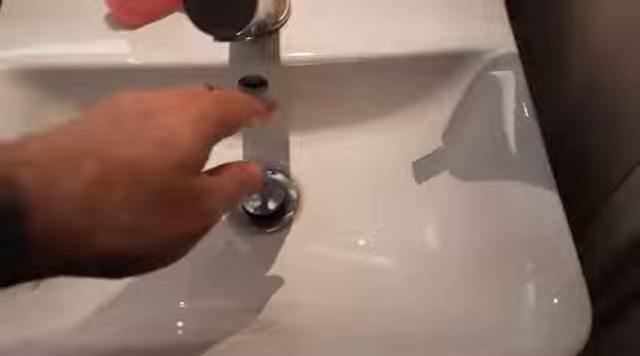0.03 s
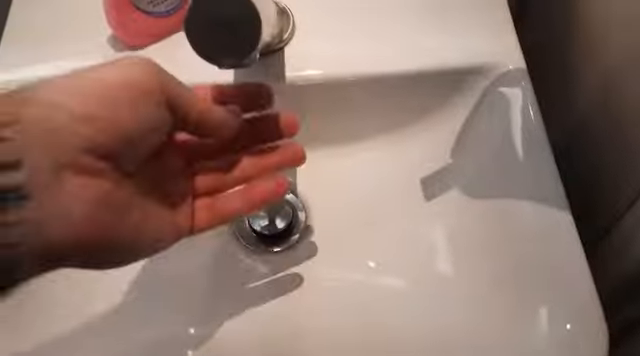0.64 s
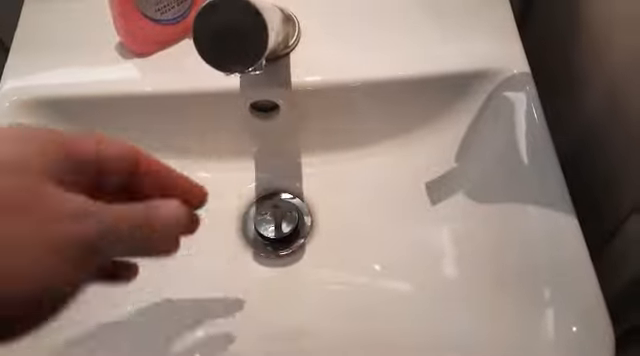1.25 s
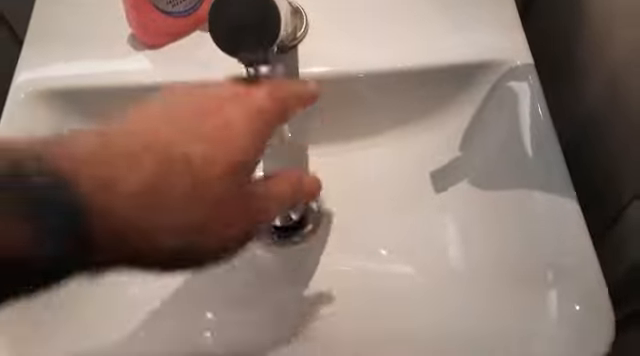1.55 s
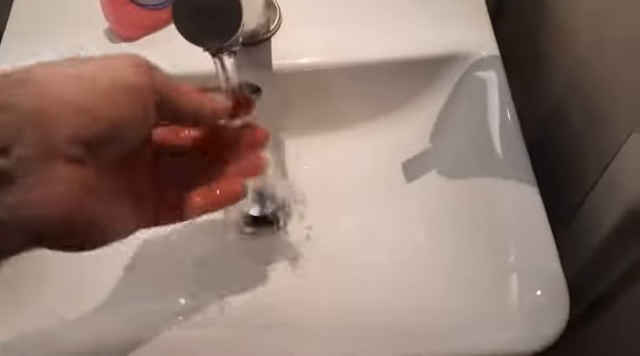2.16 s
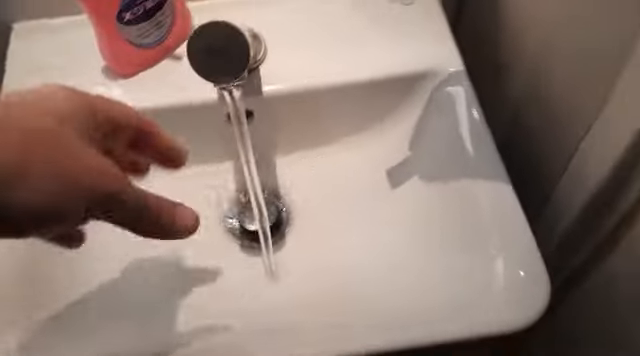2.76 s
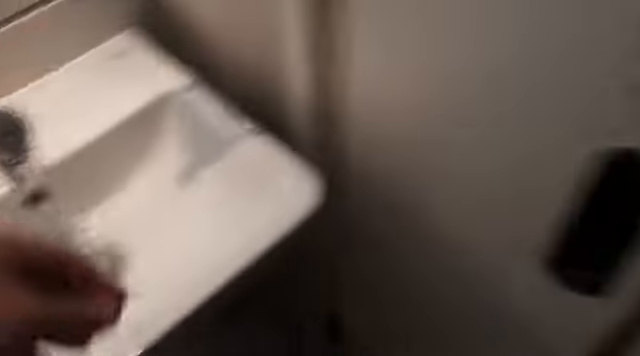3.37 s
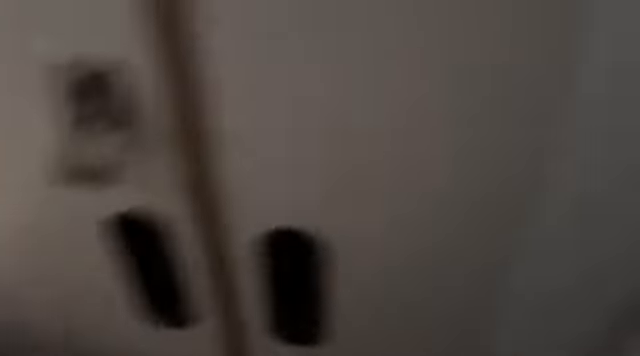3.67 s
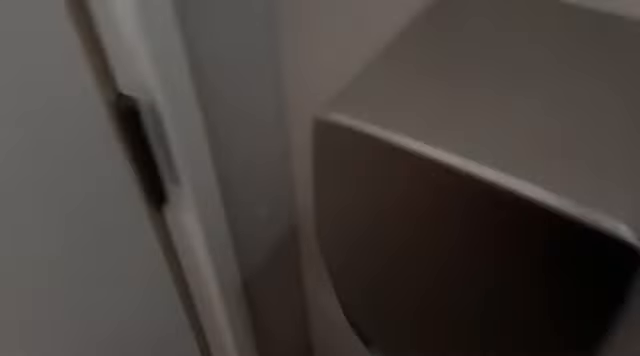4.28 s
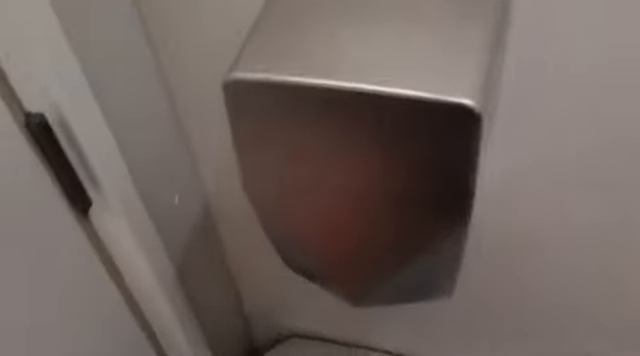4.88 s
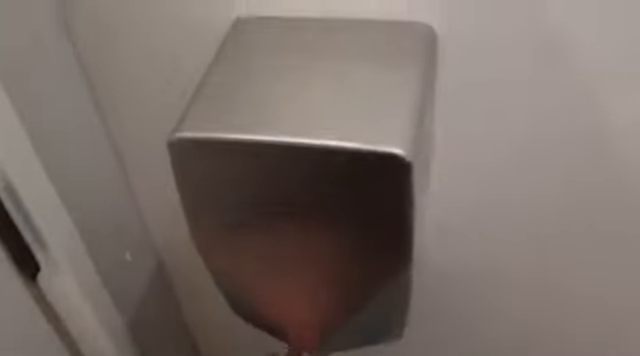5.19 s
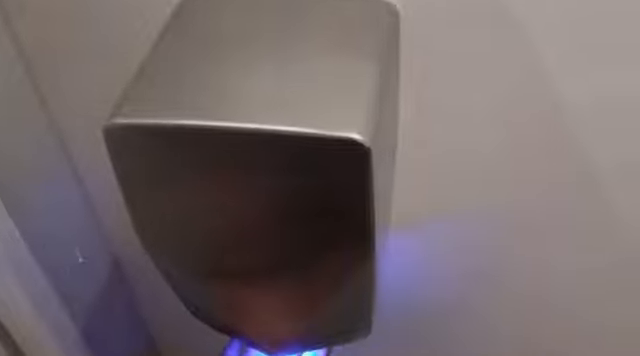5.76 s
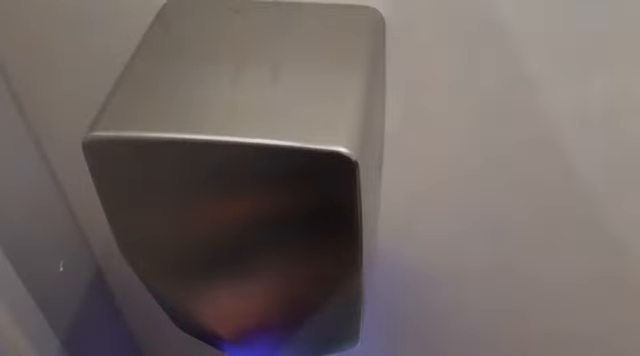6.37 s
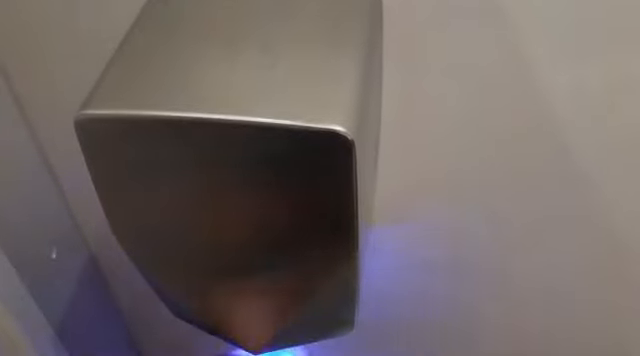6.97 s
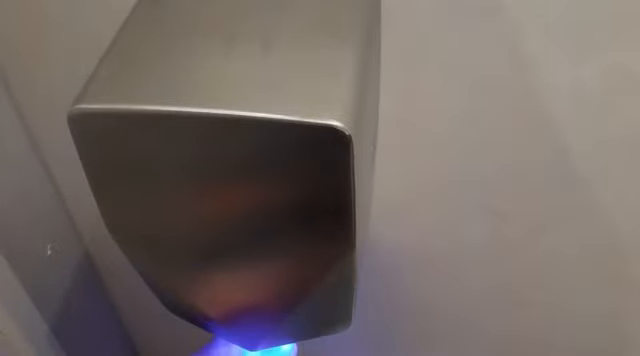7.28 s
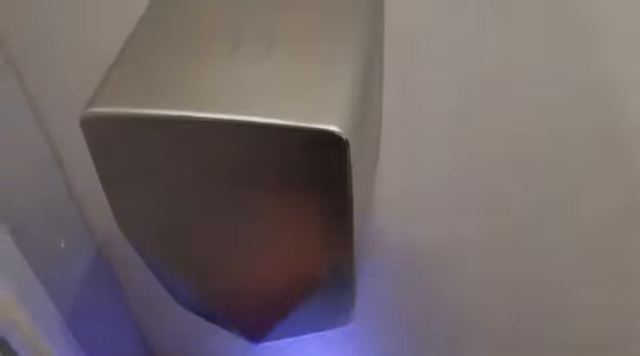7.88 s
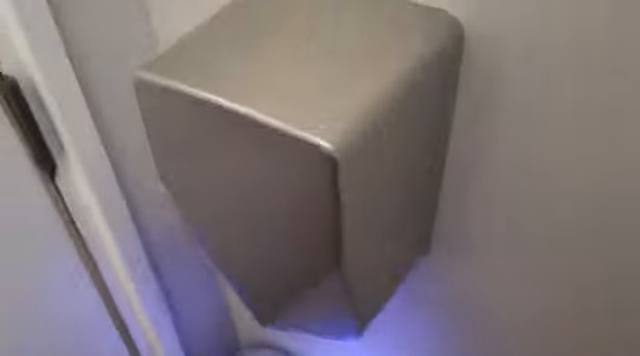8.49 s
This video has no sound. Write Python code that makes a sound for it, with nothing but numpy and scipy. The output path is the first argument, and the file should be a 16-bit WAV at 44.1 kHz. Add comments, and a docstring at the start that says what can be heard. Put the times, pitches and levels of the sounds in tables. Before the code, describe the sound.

Heard from close up, a tap opens with a knock and water spatters off a hand into a sink, slightly to the left. The drain gulps, something thuds, a sleeve rustles and the water stops. Then a hand dryer clicks and winds up into a loud, humming rush of air, strongest while it strikes the hands and quieter once they leave. The small tiled washroom adds a short echo.

```python
"""A hand dryer roars in a small tiled washroom: its turbulent jet grows as the motor spins up, and is much
louder while it strikes the hands. Before that, a push tap is knocked on. Water splashes over a hand,
runs into the basin and gurgles in the drain, where pockets of air resonate. The listener turns away,
something thuds, a sleeve swishes and the tap shuts off with a soft hiss; then the dryer clicks on.
The tiles reverberate, and a faint far fan excites the room's standing waves."""
import sys
import numpy as np
from scipy import signal
from scipy.fft import rfft, irfft, next_fast_len
from scipy.io import wavfile

SR = 44100
rng = np.random.default_rng(int(sys.argv[2]) if len(sys.argv) > 2 else 0)


def persist_wave(psi):
    """Save psi, clipped to +-1, as 16-bit WAV."""
    counts = np.round(np.clip(psi, -1, 1) * 32767).astype(np.int16)
    wavfile.write(sys.argv[1], SR, np.atleast_2d(counts).T)


N = 381024
T = np.arange(N) / SR

# jet striking the turning hands: time_s, rush_db, hiss_re_rush_db
JET_ON_HANDS = [(5.82, -17.3, -10), (5.95, -18, -7), (6.095, -21, -6.5), (6.14, -15, -10.5),
                (6.22, -18.3, -5.5), (6.36, -17.3, -2.5), (6.57, -16.5, -3), (6.66, -22.5, -6.5),
                (6.86, -21, 1), (6.99, -21, -2), (7.06, -15.3, -5), (7.22, -16.7, -2), (7.43, -16.4, -3),
                (7.48, -20.5, -5), (7.66, -21, -2), (7.81, -21, -3), (7.87, -18, -2)]
# spectra of the jet, blowing freely and striking the hands: frequency_hz, density_db
FREE_JET_SPECTRUM = [(140, -7), (230, -6.5), (350, 0.5), (520, -2), (800, -8.5), (2200, -11), (5000, -15),
                     (16000, -13.5)]
RUSH_SPECTRUM = [(500, -7), (1050, -8), (1500, 0.5), (2400, 0.5), (3400, -8.5), (6000, -7.5), (16000, -11)]
# steady ringing peaks in the dryer's rush: frequency_hz, boost_db
JET_PEAKS = [(472, 5.5), (803, 7), (945, 7), (1134, 8), (1306, 4), (1752, 4.5), (1953, 3.5), (2384, 4)]
# casing resonances that the rotor's hum sweeps through: frequency_hz, width_hz, hum_db
CASING_MODES = [(228, 50, -20.5), (374, 44, -20), (414, 8, -24), (427.5, 3.2, -17.5), (447, 4, -29)]
# glide of the motor's squeal: time_s, pitch_hz
SQUEAL_GLIDE = [(5.682, 1780), (5.726, 1880)]
# spray off the hand while it is in the stream: time_s, level_db
HAND_SPRAY = [(1.80, -50), (1.85, -38), (2.045, -32), (2.115, -48), (2.205, -32.5), (2.285, -47.5),
              (2.346, -44), (2.354, -28), (2.56, -37), (2.66, -64)]
# spectrum of the spray: frequency_hz, density_db
SPRAY_SPECTRUM = [(1800, -22.5), (3000, -7), (6000, -0.5), (10000, -1), (16000, 6.5)]
# water slopping into the basin: start_s, spray_db, bubbling_db
SLOSHES = [(1.985, -43, -47.5), (2.469, -40, -50), (2.694, -45.5, -49), (2.979, -45.5, -49),
           (3.118, -42.5, -48.5), (3.47, -45.5, -49)]
# cavity resonances of basin and waste pipe: frequency_hz, width_hz, gain_db
BASIN_MODES = [(205, 130, 1), (477, 127, 8), (1430, 240, 2.5), (2000, 500, -12)]
# single drops slapping down: start_s, level_db, pitch_hz
DROP_IMPACTS = [(1.834, -29, 5500), (1.9423, -15.5, 5230), (1.952, -23.5, 5300), (1.982, -18, 6660),
                (2.0167, -21, 2780), (2.128, -25, 7600), (2.1492, -20, 6650), (2.1984, -15.5, 5250),
                (2.239, -19.5, 11100), (2.3068, -21, 7300), (2.3511, -9, 12000), (2.367, -10, 7750),
                (2.4304, -5, 6600), (2.5106, -24, 1960), (2.5646, -14.5, 6800), (2.702, -28, 1650)]
# gulps of air in the drain: start_s, pitch_hz, level_db
DRAIN_GULPS = [(1.975, 477, -35.5), (2.697, 553, -42), (3.168, 480, -40), (3.394, 470, -28.5),
               (3.398, 1110, -44), (3.497, 444, -27), (3.545, 440, -30.5), (3.63, 445, -37.5),
               (3.737, 385, -34), (3.833, 365, -37.5), (3.882, 2040, -46.5)]
# spectra of the tap's push, the thud, the dryer's switch and the bumps: frequency_hz, density_db
TAP_PUSH_SPECTRUM = [(60, 6), (200, 6), (350, -3.5), (1500, -9), (3200, -24), (6500, -22), (10000, -4.5),
                     (16000, -23)]
THUD_SPECTRUM = [(70, -6), (190, 1.5), (400, -15), (680, -6), (1000, -23), (1450, -16.5), (3000, -27),
                 (7000, -38)]
SWITCH_SPECTRUM = [(140, -12), (240, -3), (380, 6.5), (600, -9), (2200, -21), (3800, -22), (16000, -11)]
BUMP_SPECTRUM = [(45, -7.5), (130, -6), (260, -10.5), (700, -25)]
# soft bumps of handling: centre_s, level_db
HANDLING_BUMPS = [(2.46, -48.5), (2.81, -54), (3.54, -44.5), (4.06, -42.5)]
# soft swishes, a sleeve rustling and then the tap's valve hissing shut: centre_s, level_db, half_width_s
SOFT_SWISHES = [(4.425, -40.5, .1), (4.955, -52, .06)]
# spectrum of the swishes: frequency_hz, density_db
SWISH_SPECTRUM = [(300, 0.5), (16000, -4)]
# spectrum of the far fan: frequency_hz, density_db
VENT_SPECTRUM = [(45, -1.5), (90, -6.5), (300, -13), (520, -28), (2000, -36.5), (4500, -41.5),
                 (16000, -33.5)]
# standing waves of the room: frequency_hz, boost_db
ROOM_MODES = [(145, 13.5), (210, 16)]
# stereo width of the diffuse field: frequency_hz, side_re_mid_db
STEREO_WIDTH = [(50, -9.5), (150, -15.5), (470, -0.5), (1900, -3.5), (5000, 0)]
# responses of the two microphones: frequency_hz, gain_db
LEFT_RESPONSE = [(10, 0.5), (6000, -0.06), (7650, 4.5), (8200, 0.5), (9800, -16), (13000, -6.5),
                 (16000, -10.5)]
RIGHT_RESPONSE = [(10, -1), (4500, -0.2), (6900, -2), (8200, -7.5), (9400, -7), (12800, -3), (16000, -9)]

DRYER_ON_S, FULL_SPEED_HZ, SPIN_UP_S, CREEP_S, CREEP_SHARE = 5.655, 489.4, .14, 0.99, .152
HANDS_IN_S, HANDS_OUT_S, ENTER_DB_PER_S, LEAVE_DB_PER_S = 5.81, 7.89, 199, 197
HUM_DB = -46.5  # away from the casing's resonances
TAP_OPEN_S, TAP_SHUT_S, FLOW_RISE_S, FLOW_FALL_DB_PER_S = 1.65, 4.93, 0.24, 66
STREAM_DB, BUBBLING_DB, VALVE_HISS_DB = -55.5, -59, -56
VALVE_GROWTH_DB_PER_S = 8.5  # the valve hisses more as it narrows
ROOM_T60_S, CUTOFF_HZ = 0.34, 16000


def air_jet():
    """Turbulence radiates broadband noise, rising with motor speed; hands in the jet add much more."""
    speed = motor_speed()
    free = rms_one(colour(washroom(diffuse(), wet_db=-5.0), FREE_JET_SPECTRUM))
    free *= from_db(-28.5) * speed ** 1.3
    # low eddies stir the room's standing waves, more so once the jet blows freely
    eddies = rms_one(boost(resonate(diffuse(), 178, 120), ROOM_MODES, width_hz=8.9))
    eddies *= from_db(np.interp(T, [7.4, 8.1], [-40.5, -33]))
    return (pan(free + hands_in_jet(speed), left_db=2.0) + pan(eddies, left_db=-0.8)) * dryer_on()


def hands_in_jet(speed):
    """Obstacles in a flow shed eddies: broad ones rush off the palms, fine ones hiss off the fingers."""
    rush_db, hiss_db = in_time(JET_ON_HANDS)
    stream = boost(colour(washroom(diffuse(), wet_db=-3), RUSH_SPECTRUM), JET_PEAKS, width_hz=19)
    rush = rms_one(signal.sosfilt(butterworth(4, 3400, "low"), stream))
    hiss = rms_one(high_pass(stream, hz=3400)) * from_db(hiss_db + 1.5)
    # the less the jet hisses on the fingers, the more it roars in the palms
    roar = colour(rush, [(520, 0), (1000, 0)]) * (from_db(-.8 * (hiss_db + 3.8)) - 1)
    # the rush brightens as the motor gains speed
    edge = signal.sosfiltfilt(butterworth(2, 2450, "high"), rush) * ((speed / .93) ** 2 - 1)
    away_db = ENTER_DB_PER_S * np.maximum(HANDS_IN_S - T, 0)
    away_db += LEAVE_DB_PER_S * np.maximum(T - HANDS_OUT_S, 0)
    flutter_db = 0.83 * drift(rate_hz=14.0)
    return from_db(rush_db - 0.69 - away_db + flutter_db) * (rush + roar + edge + hiss)


def motor():
    """Forced vibration: the rotor hums at its rotation rate, louder as it crosses casing resonances."""
    speed = motor_speed()
    rotor_hz = FULL_SPEED_HZ * speed
    phase = 2 * np.pi * np.cumsum(rotor_hz * (1 + 0.00194 * drift(rate_hz=22.7))) / SR
    resonant_gain = sum(from_db(db) * np.exp(-np.minimum(((rotor_hz - hz) / width_hz) ** 2, 20))
                        for hz, width_hz, db in CASING_MODES)
    hum_gain = (from_db(HUM_DB) * speed + resonant_gain) * from_db(2.0 * drift(rate_hz=56))
    labouring = (1 - speed) * np.sin(2 * phase) / 2  # an octave above, while the rotor is still slow
    hum = hum_gain * (np.sin(phase + 0.36 * drift(rate_hz=77)) + labouring)
    whine = from_db(-44) * swell(8.32, half_width_s=0.11) * np.sin(9 * phase)  # nine blades, briefly
    casing_ring = rms_one(resonate(rng.standard_normal(N), 1650, 70))
    casing_ring *= from_db(-34) * swell(5.76, half_width_s=0.025)  # as the motor takes hold
    # the starting current buzzes at twice the mains frequency
    inrush = from_db(-37) * swell(5.77, half_width_s=0.11) * np.sin(2 * np.pi * 100 * T)
    running = np.sqrt(2) * dryer_on() * (hum + whine + casing_ring + inrush)
    return washroom(pan(running, left_db=1.5), wet_db=-10)


def motor_speed():
    """The share of full speed approaches 1 exponentially: a quick run-up plus a slow creep."""
    age = np.maximum(T - DRYER_ON_S, 0)
    return 1 - (1 - CREEP_SHARE) * np.exp(-age / SPIN_UP_S) - CREEP_SHARE * np.exp(-age / CREEP_S)


def dryer_on():
    """A short ramp from 0 to 1 as the dryer is switched on."""
    return np.clip((T - DRYER_ON_S) / 0.016, 0, 1)


def squeal():
    """A chirp, a tone of rising frequency, sounds as the motor breaks loose."""
    tone = np.sin(2 * np.pi * np.cumsum(in_time(SQUEAL_GLIDE)[0]) / SR)
    return washroom(from_db(-38.5) * during(SQUEAL_GLIDE, fade_s=.008) * tone, wet_db=-10)


def running_water():
    """Impact and bubble resonance: spray crackles, small bubbles ping, larger ones ring the basin."""
    flow = np.clip((T - TAP_OPEN_S) / FLOW_RISE_S, 0, 1)
    flow *= from_db(-FLOW_FALL_DB_PER_S * np.maximum(T - TAP_SHUT_S, 0))
    unsteady_flow = flow * from_db(1.1 * drift(rate_hz=9))
    spray_gain, bubble_gain = from_db(STREAM_DB) * unsteady_flow, from_db(BUBBLING_DB) * unsteady_flow
    for start_s, spray_db, bubbling_db in SLOSHES:  # incoherent sources add in power
        slosh = burst(start_s, rise_s=0.0036, hold_s=0.029, t60_s=0.6)
        spray_gain = np.hypot(spray_gain, from_db(spray_db) * slosh)
        bubble_gain = np.hypot(bubble_gain, from_db(bubbling_db) * slosh)
    crackle = grains(per_s=1100, low_hz=2020, high_hz=15700, cycles=20, spread_db=4.0)
    pings = grains(per_s=1200, low_hz=2396, high_hz=11930, cycles=99, spread_db=4.0, pitches=32)
    hand_spray = rms_one(high_pass(colour(crackle + .5 * pings + diffuse() / 4, SPRAY_SPECTRUM), hz=1400))
    hand_spray *= from_db(in_time(HAND_SPRAY)[0] - 1.5) * during(HAND_SPRAY, fade_s=0.049)
    stream = spray_gain * rms_one(colour(pings + .8 * diffuse(), SPRAY_SPECTRUM))
    valve_gain = from_db(VALVE_HISS_DB + VALVE_GROWTH_DB_PER_S * (T - TAP_SHUT_S)) * flow
    valve = valve_gain * rms_one(resonate(diffuse(), 11500, 3000))
    bubbles = grains(per_s=700, low_hz=417.3, high_hz=3233, cycles=47, spread_db=3.0, pitches=32)
    bubbles += .5 * diffuse()
    basin = sum(from_db(db) * resonate(bubbles, hz, width_hz) for hz, width_hz, db in BASIN_MODES)
    basin = bubble_gain * rms_one(washroom(basin, wet_db=-2.5))  # deep in the bowl, so more reflected
    left_db = 4.1 * np.interp(T, [2.7, 4.2], [1, .4])  # the basin is on the left until the listener turns
    water = (hand_spray + stream + valve + basin) * from_db([left_db / 2, -left_db / 2])
    return washroom(water, wet_db=-1.0)


def drops():
    """Impact excites a damped ring: each large drop slaps, then its fragments patter on briefly."""
    impacts, age = np.zeros((2, N)), T[:SR // 20]
    for start_s, db, hz in DROP_IMPACTS:
        at = round(start_s * SR)
        slap = resonate(rng.standard_normal((2, len(age))) * np.exp(-age * hz / 5), hz, hz * 0.21)
        slap /= np.abs(slap.mean(axis=0)).max()
        fragments = resonate(rng.standard_normal((2, len(age))), hz, hz) * np.exp(-age / 0.024)
        impacts[:, at:at + len(age)] += from_db(db) * (slap + from_db(-13.5) * fragments)
    return washroom(pan(high_pass(impacts + 1e-18, hz=1476), left_db=2.5), wet_db=-3.0)


def gurgle():
    """Water spilling off the hand makes narrow-band noise whose centre frequency falls."""
    hz = np.interp(T, [2.39, 2.53], [3400, 1900])
    churn = (drift(rate_hz=150) + 1j * drift(rate_hz=140)) * np.exp(2j * np.pi * np.cumsum(hz) / SR)
    spill = from_db(-42.5) * swell(2.47, half_width_s=0.06) * churn.real
    return washroom(pan(spill, left_db=1.5), wet_db=-2)


def drain():
    """Trapped air resonates: each gulp rings a wobbling pocket and bursts small bubbles above it."""
    gulps, gulping = np.zeros(N), np.zeros(N)
    churn = rms_one(np.abs(1 + 0.32 * drift(rate_hz=56)))
    wobble_s = .00019 * drift(rate_hz=50)
    for start_s, hz, db in DRAIN_GULPS:
        envelope = from_db(db) * burst(start_s, rise_s=.02, hold_s=.028, t60_s=.24)
        gulps += np.sqrt(2) * envelope * churn * np.cos(2 * np.pi * hz * (T + wobble_s))
        gulping += envelope
    # the pipe washes hollowly, and once more as the flow ends
    washing = swell(3.7, half_width_s=0.25)
    wash = rms_one(resonate(resonate(diffuse(), 428, 180), 400, 300))
    wash *= from_db(-46) * washing + from_db(-54) * swell(4.82, half_width_s=.13)
    froth = grains(per_s=600, low_hz=720, high_hz=2150, cycles=60, spread_db=2.0)
    froth *= gulping * from_db(-23.5) + from_db(-52) * washing
    return pan(washroom(gulps + wash + froth, wet_db=-8), left_db=1.0)


def knock(start_s, spectrum, level_db, rise_s, hold_s, t60_s):
    """Structure-borne sound: a blow on a fitting booms through the wall and decays, the treble first."""
    boom = rms_one(colour(diffuse(), spectrum))
    treble = signal.sosfiltfilt(butterworth(2, 3000, "high"), boom)
    slow_decay = burst(start_s, rise_s, hold_s, t60_s)
    fast_decay = burst(start_s, rise_s, hold_s, 0.57 * t60_s)
    return from_db(level_db) * ((boom - treble) * slow_decay + treble * fast_decay)


def knocks():
    """Impact transients: the tap's push, a thud and the dryer's switch, with handling bumps between."""
    tap = knock(1.549, TAP_PUSH_SPECTRUM, level_db=-31.5, rise_s=0.0042, hold_s=0.03, t60_s=0.48)
    thud = knock(4.175, THUD_SPECTRUM, level_db=-27.0, rise_s=0.016, hold_s=0.026, t60_s=0.48)
    switch = knock(5.660, SWITCH_SPECTRUM, level_db=-31.5, rise_s=0.001, hold_s=0.029, t60_s=0.36)
    handling = sum(from_db(db) * swell(centre_s, half_width_s=0.077) for centre_s, db in HANDLING_BUMPS)
    return pan(tap + thud, left_db=3.0) + switch + handling * rms_one(colour(diffuse(), BUMP_SPECTRUM))


def swishes():
    """Swells of broadband noise: a sleeve rustles, then the tap's valve hisses shut."""
    envelope = sum(from_db(db) * swell(centre_s, half_s) for centre_s, db, half_s in SOFT_SWISHES)
    return envelope * rms_one(colour(diffuse(), SWISH_SPECTRUM))


def ventilation():
    """Noise from a faint far fan excites the room's standing waves."""
    hum = rms_one(boost(colour(diffuse(), VENT_SPECTRUM), ROOM_MODES, width_hz=7.6))
    return pan(from_db(-68) * hum, left_db=5.0)


def washroom(x, wet_db):
    """Reverberation: direct sound plus the tiles' dense, duller reflections, decaying exponentially."""
    tail = (diffuse() * from_db(-60 * T / ROOM_T60_S) * (T > .003))[:, :SR // 2]
    tail = signal.lfilter(*signal.butter(1, 7000, fs=SR), tail / np.sqrt(np.sum(tail ** 2) / 2))
    return x + from_db(wet_db) * signal.fftconvolve(np.atleast_2d(x), tail, axes=1)[:, :N]


def diffuse():
    """A diffuse field: broadband stereo noise, coherent in the bass and incoherent in the treble."""
    hz, db = np.transpose(STEREO_WIDTH)
    mid, side = rng.standard_normal((2, N))
    side = irfft(rfft(side) * from_db(np.interp(np.arange(N // 2 + 1) * SR / N, hz, db)), N)
    return np.array([mid + side, mid - side])


def grains(per_s, low_hz, high_hz, cycles, spread_db, pitches=20):
    """A Poisson stream of droplets or bubbles of uneven size, each a damped resonator; rms 1."""
    ringing = np.zeros((2, N))
    for hz in np.geomspace(low_hz, high_hz, pitches):
        wait, size, left, right = rng.random((4000, 4)).T
        at = np.cumsum(-np.log(1 - wait) * SR * pitches / per_s).astype(int)
        size_db = spread_db * np.minimum(-np.log(1 - size), 3)
        strength = from_db(size_db) * np.sin(2 * np.pi * np.array([left, right]))
        clicks = np.zeros((2, N))
        clicks[:, at[at < N]] = strength[:, at < N]
        ringing += resonate(clicks, hz, 2 * hz / cycles)
    return rms_one(ringing)


def resonate(x, hz, width_hz):
    """A damped resonator with unit gain at its peak."""
    radius = np.exp(-np.pi * width_hz / SR)
    feedback = [1, -2 * radius * np.cos(2 * np.pi * hz / SR), radius ** 2]
    return signal.lfilter(np.array([1, 0, -1]) * (1 - radius ** 2) / 2, feedback, x + 1e-18)


def boost(x, modes, width_hz):
    """Resonance lifts a sound at the frequency of each mode."""
    return x + sum((from_db(db) - 1) * resonate(x, hz, width_hz) for hz, db in modes)


def colour(x, spectrum):
    """Filter by a spectrum that falls 12 dB per octave beyond its ends."""
    hz, db = np.transpose(spectrum)
    size = next_fast_len(N + SR // 10, real=True)
    bin_hz = np.maximum(np.arange(size // 2 + 1) * SR / size, 1)
    skirts = np.minimum(1, np.minimum(bin_hz / hz[0], hz[-1] / bin_hz)) ** 2
    gain = skirts * from_db(np.interp(np.log(bin_hz), np.log(hz), db))
    return irfft(rfft(x, size) * gain, size)[..., :N]


def butterworth(order, hz, kind):
    """Sections of a filter with a maximally flat passband."""
    return signal.butter(order, hz, kind, fs=SR, output="sos")


def high_pass(x, hz):
    """Attenuate by 24 dB per octave below a corner frequency."""
    return signal.sosfilt(butterworth(4, hz, "high"), x)


def drift(rate_hz):
    """Random fluctuation: low-passed noise of rms 1."""
    hz = np.arange(N // 2 + 1) * SR / N
    return rms_one(irfft(rfft(rng.standard_normal(N)) / (1 + (hz / rate_hz) ** 2), N))


def burst(start_s, rise_s, hold_s, t60_s):
    """A linear attack, with exponential decay from hold_s after the start."""
    decay = from_db(-60 * np.clip(T - start_s - hold_s, 0, 2) / t60_s)
    return np.clip((T - start_s) / rise_s, 0, 1) * decay


def swell(centre_s, half_width_s):
    """A bell-shaped envelope around a moment."""
    return np.exp(-np.minimum(((T - centre_s) / half_width_s) ** 2, 50))


def in_time(rows):
    """Interpolate each column of a curve at every sample."""
    time_s, *columns = np.transpose(rows)
    return [np.interp(T, time_s, column) for column in columns]


def during(rows, fade_s):
    """1 while a curve lasts, fading to 0 outside it."""
    return np.clip(1 + np.minimum(T - rows[0][0], rows[-1][0] - T) / fade_s, 0, 1)


def pan(x, left_db):
    """A level difference between the channels leans a sound to the left."""
    return x * from_db([[left_db / 2], [-left_db / 2]])


def rms_one(x):
    """Scale so that the middle of the stereo image has rms 1."""
    return x / np.sqrt(np.mean(np.atleast_2d(x).mean(axis=0) ** 2) + 1e-20)


def from_db(db):
    """Decibels to amplitude ratio."""
    return 10 ** (np.asarray(db) / 20)


def scene():
    """Superposition: the pressures of all sources in the washroom add."""
    background = ventilation() + knocks()
    washing = running_water() + drops() + gurgle() + drain() + swishes()
    dryer = squeal() + motor() + air_jet()
    return dryer + washing + background


def record(dry):
    """Frequency response: the left microphone peaks in the treble, the right sags; the top is cut."""
    heard = np.array([colour(dry[0], LEFT_RESPONSE), colour(dry[1], RIGHT_RESPONSE)])
    return signal.sosfilt(signal.ellip(12, .1, 80, CUTOFF_HZ, fs=SR, output="sos"), heard)


dry = scene()
out = record(dry)
persist_wave(out)
```